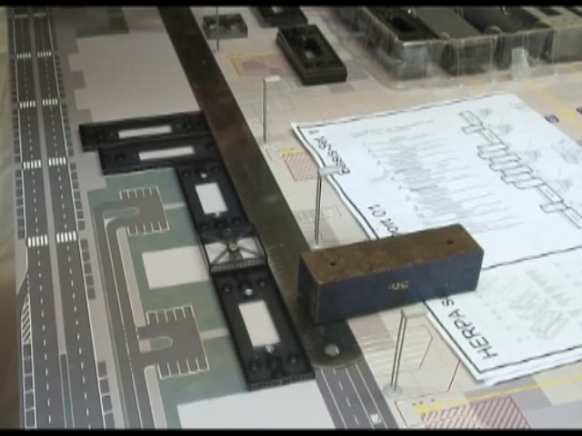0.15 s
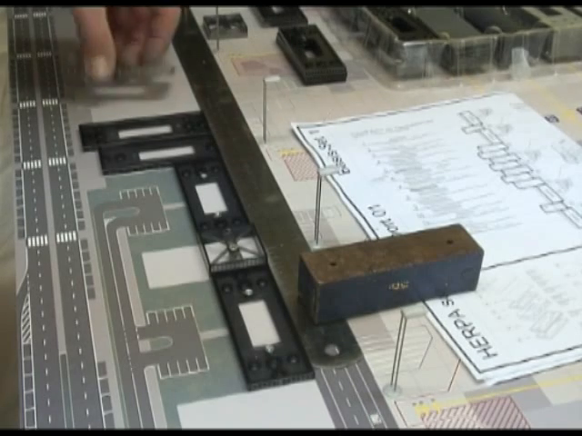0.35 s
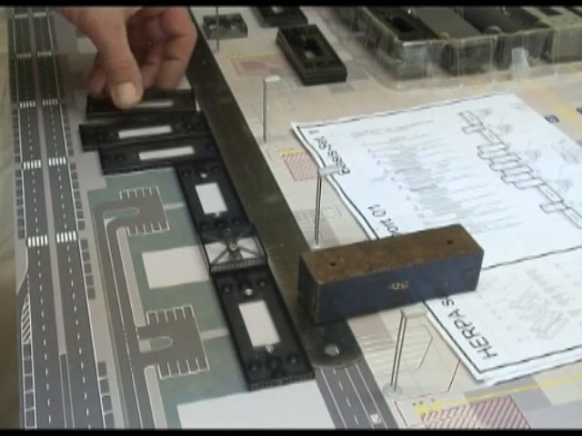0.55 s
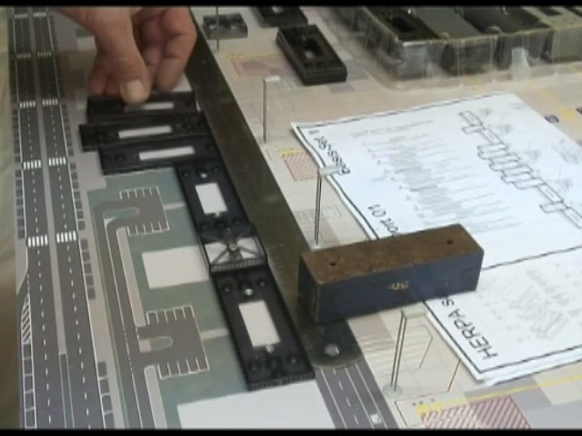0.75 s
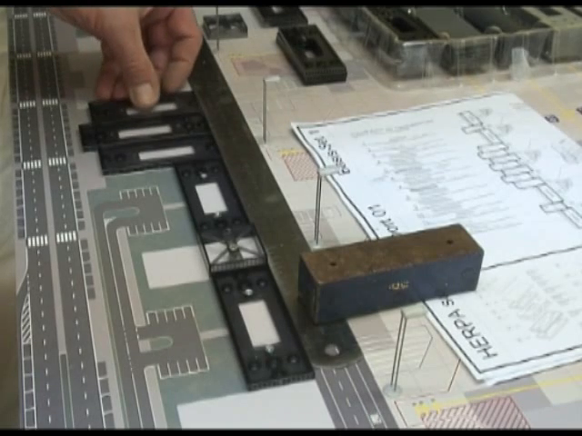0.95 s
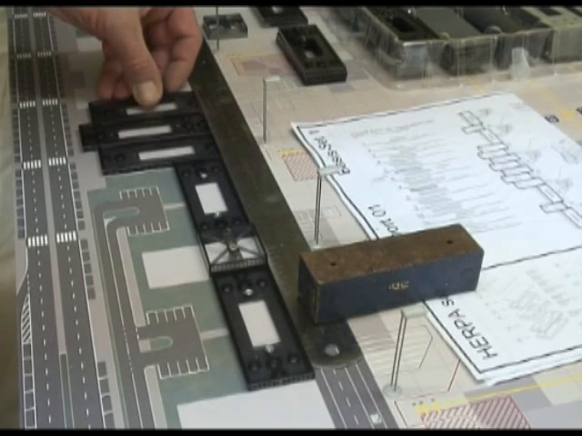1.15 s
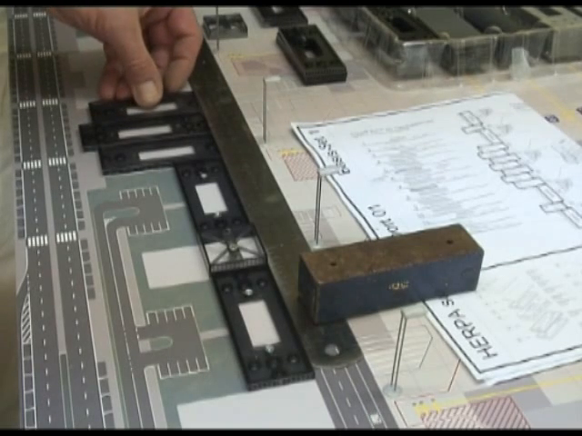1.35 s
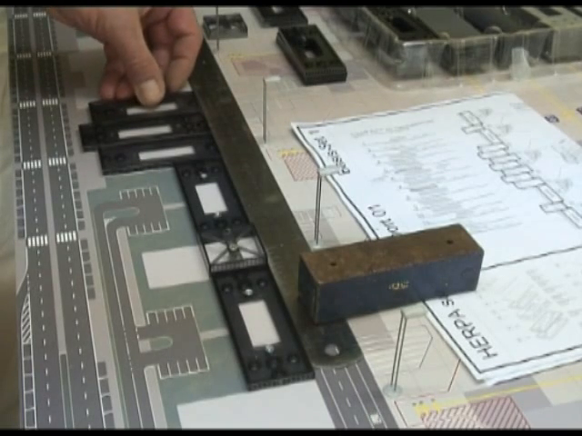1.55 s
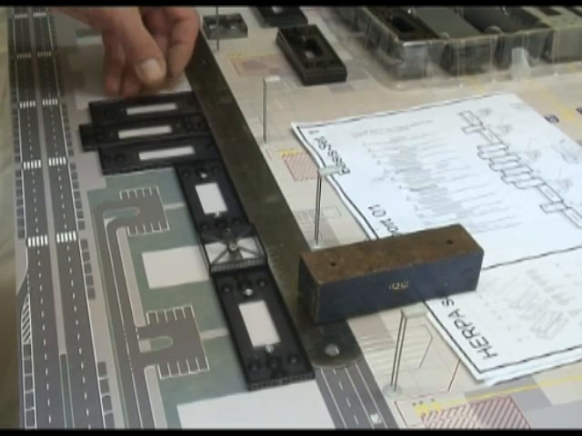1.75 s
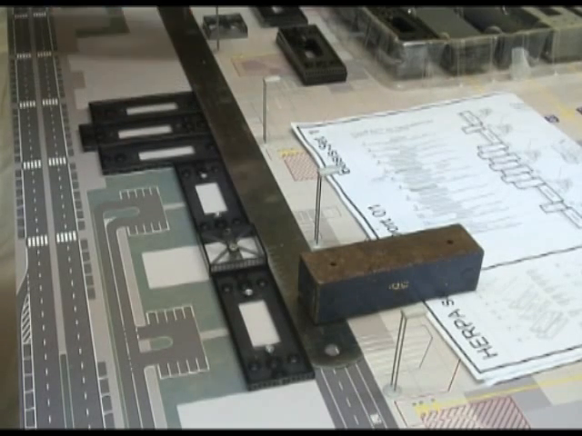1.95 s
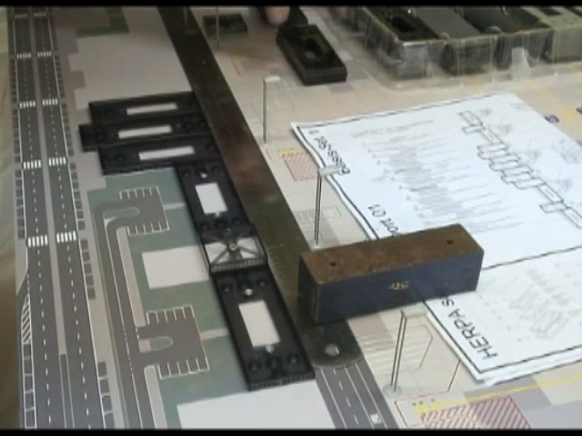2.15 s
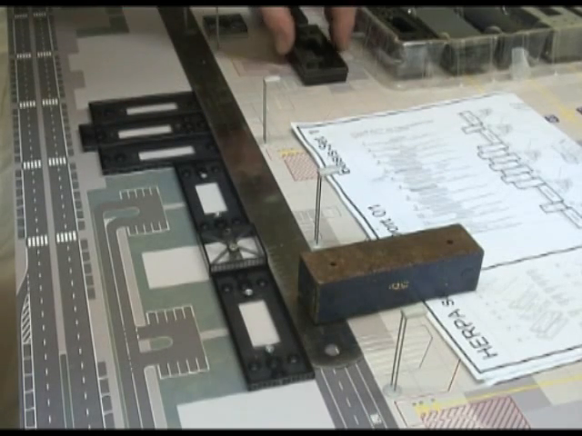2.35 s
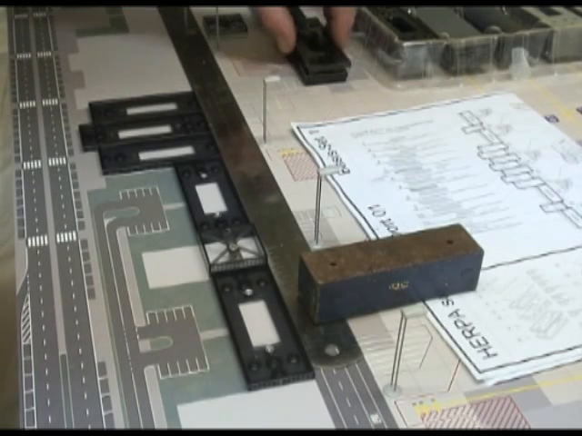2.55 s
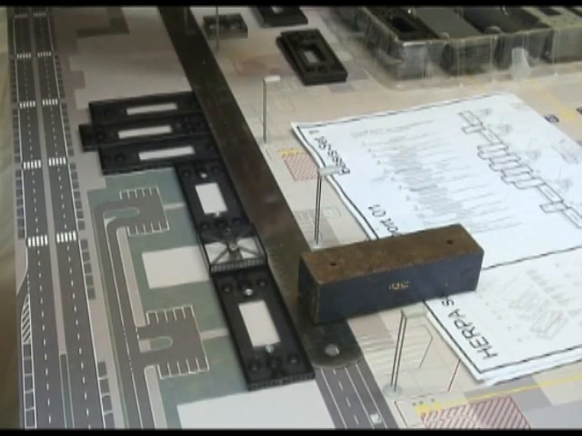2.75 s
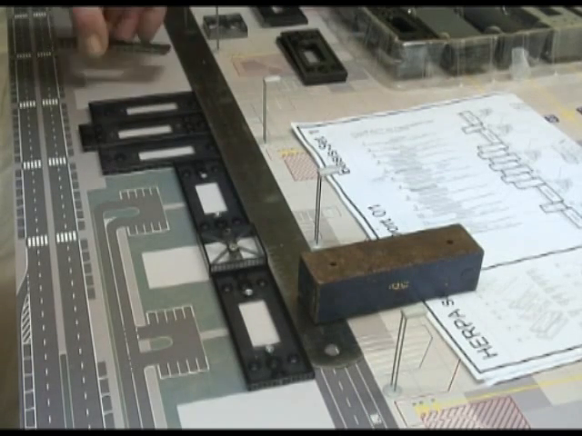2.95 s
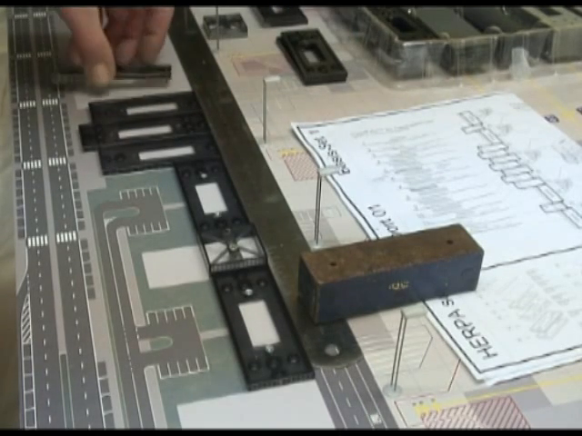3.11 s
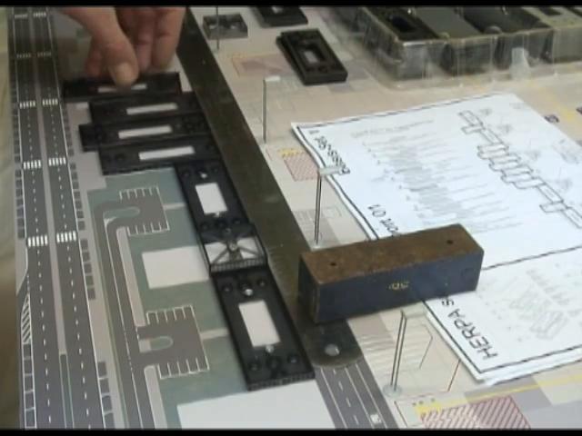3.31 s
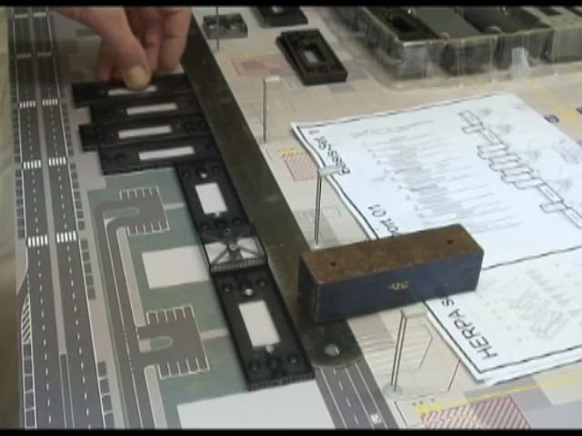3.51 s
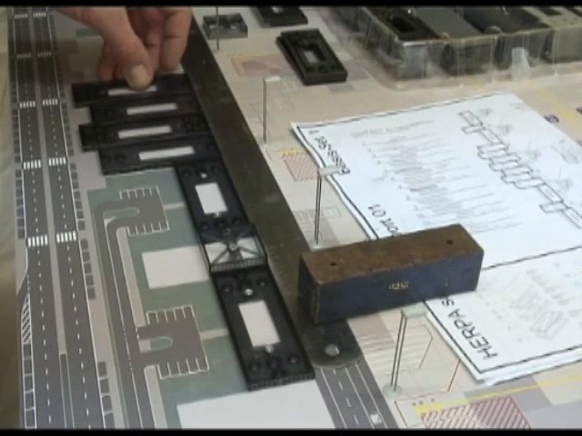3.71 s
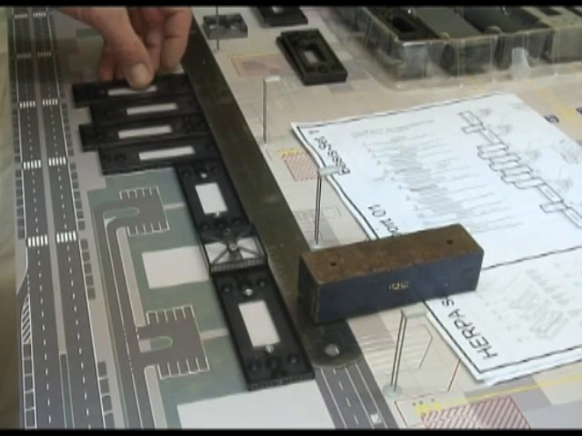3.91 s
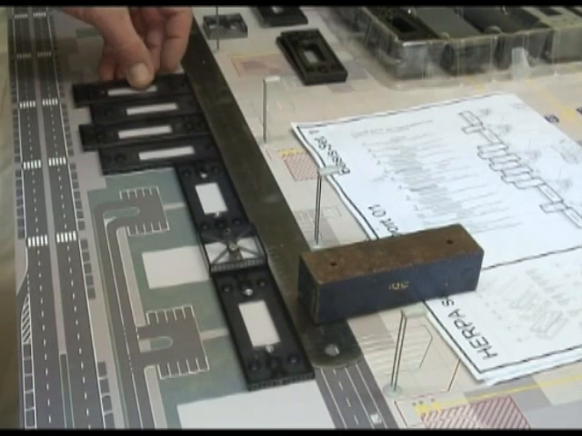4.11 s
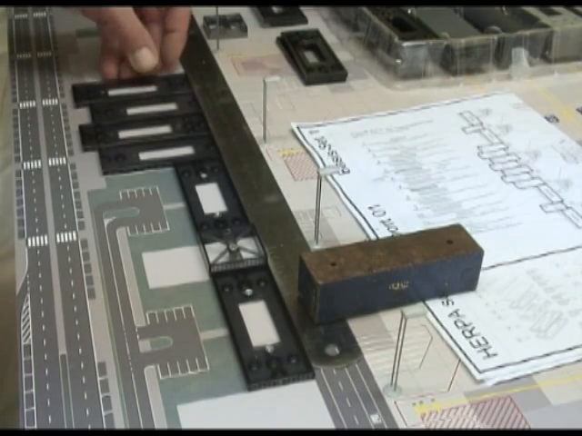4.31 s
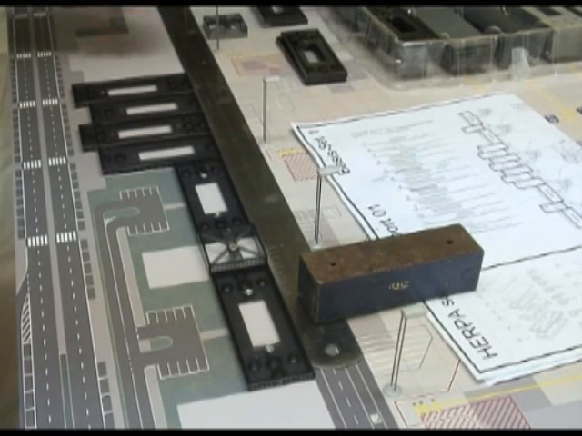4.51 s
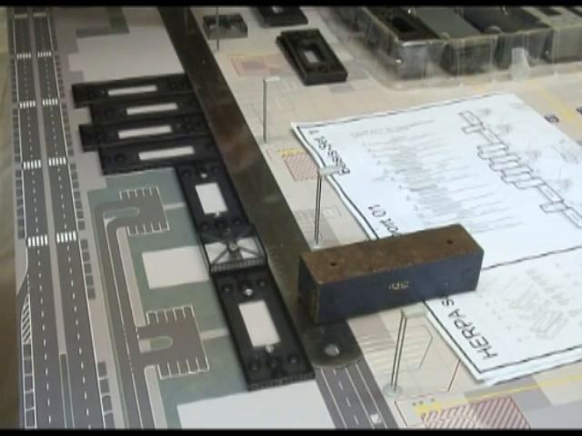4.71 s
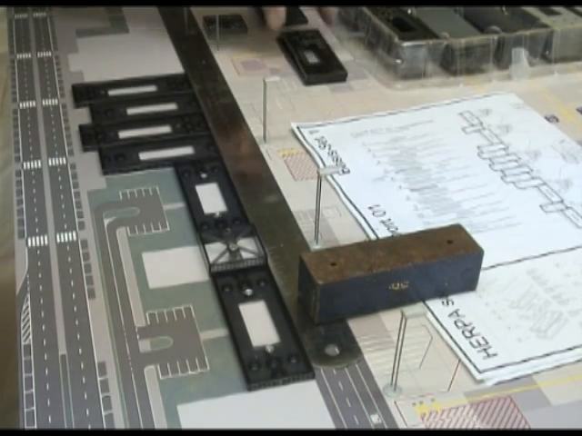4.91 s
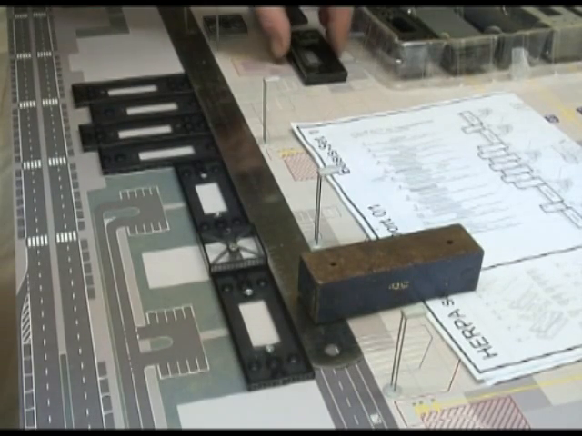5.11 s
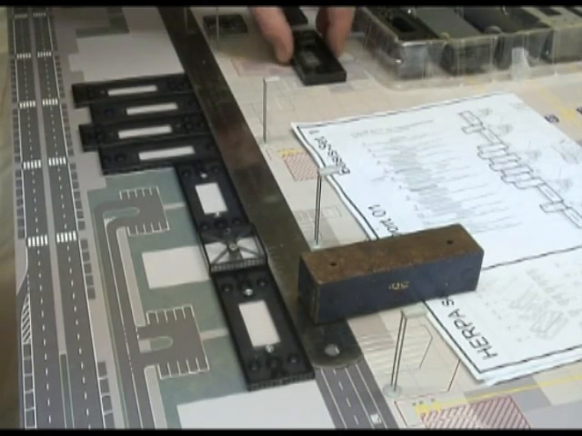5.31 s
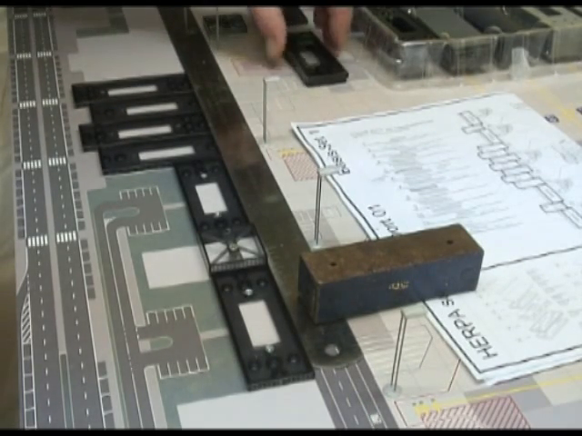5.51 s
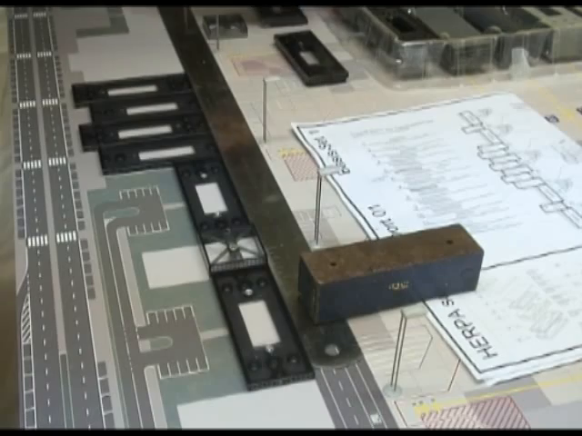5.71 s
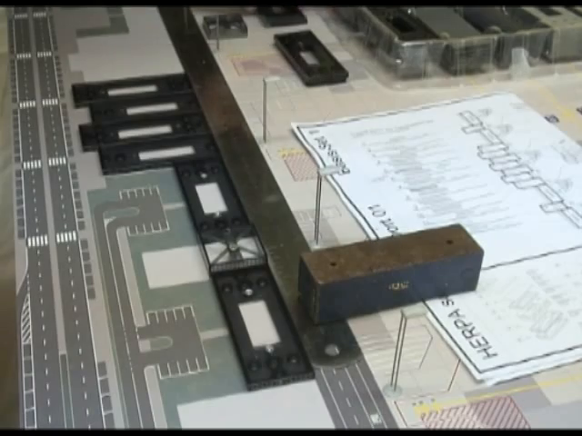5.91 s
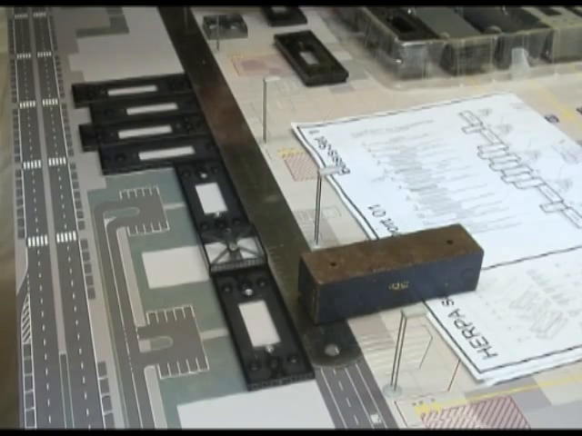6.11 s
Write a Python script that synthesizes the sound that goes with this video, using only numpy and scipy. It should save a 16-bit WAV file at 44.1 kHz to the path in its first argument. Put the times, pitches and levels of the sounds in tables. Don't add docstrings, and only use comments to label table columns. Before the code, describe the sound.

A faint steady hiss with low room hum runs throughout a small room with a short echo. Right at 0 s a hard plastic piece clacks sharply on a wooden board with a quick rattle and low thud. At 0.5 s there is a faint touch, then from 0.6 to 0.77 s a loud, bright, bouncing clatter, its hardest blows slightly overloaded. A crisp press snap comes at 1.0 s, dull soft touches near 1.23 s. Around 2.45-2.6 s a lighter tray scuffs and taps quietly further off. At 3.18 s a low knock leads into a very hard double clack at 3.23-3.26 s with brief chatter; small scrapes and a medium press click follow at 3.5-3.6 s. Barely audible touches continue until 4.4 s. Faint tray scrapes and taps come at 5.2-5.3, 5.53-5.6 and 5.9-6.07 s, then hiss.

```python
import sys
import numpy as np
from scipy import signal
from scipy.fft import rfft, irfft
from scipy.io import wavfile
from scipy.ndimage import uniform_filter1d

SR = 44100
rng = np.random.default_rng(int(sys.argv[2]) if len(sys.argv) > 2 else 0)


def store_wav(level_fs):
    pcm = np.round(np.clip(np.atleast_2d(level_fs), -1, 1) * 32767)
    wavfile.write(sys.argv[1], SR, pcm.T.astype(np.int16))


def ratio(d):
    e = np.asarray(d, float) / 20
    return 10 ** e


N = 276066


def evened(x):
    return x / np.sqrt(np.mean(x ** 2) + 1e-20)


def read(points, hz):
    f, value = np.transpose(points)
    return np.interp(np.log(hz + 1), np.log(f + 1), value)


def add(mix, start_s, sound):
    part = mix[..., round(start_s * SR):][..., :sound.shape[-1]]
    part += sound[..., :part.shape[-1]]


def pair(left, other, same):
    same = np.clip(same, -1, 1)
    right = same * left + np.sqrt(1 - same ** 2) * other
    return np.array([left, right])


# pitch in Hz, level in dB per Hz.
HISS_COLOUR = [(12, -60), (20, -13.5), (100, -8), (135, -6.5), (186, -7), (243, -6.5), (327, -5),
               (374, -8.5), (428, -1), (530, -14.5), (574, -11.5), (1550, -18), (2450, -18), (10500, -24),
               (12300, -29), (16000, -63), (22000, -120)]
# pitch in Hz, likeness from -1 to 1.
HISS_LIKENESS = [(60, -0.14), (170, -0.41), (500, -0.16), (1430, 0.22), (4110, 0.046), (11800, 0.0051)]


def hiss():
    frames, hz = N // 512 + 5, np.fft.rfftfreq(2048, 1 / SR)
    a, b, c, d, patches = rng.standard_normal((frames, len(hz), 5)).T
    patches = uniform_filter1d(patches, size=12, axis=0)
    patches = evened(uniform_filter1d(patches, size=8, axis=1))
    level_db = read(HISS_COLOUR, hz)[:, None] + 0.63 * patches
    z = pair(a + 1j * b, c + 1j * d, read(HISS_LIKENESS, hz)[:, None]) * ratio(level_db)
    noise = signal.istft(z, nperseg=2048, noverlap=1536)[1][:, :N]
    return ratio(-54) * evened(noise)


# pitch in Hz, time in seconds to fall by 60 dB.
ECHO_TIMES = [(150, 0.62), (400, 0.34), (1040, 0.36), (2760, 0.39), (7280, 0.34)]
# pitch in Hz, likeness from -1 to 1.
ROOM_LIKENESS = [(60, -0.37), (170, 1), (500, 0.25), (1430, 0.68), (4110, -0.036), (11800, -0.25)]


def room(x):
    size = 24000
    taps = rng.standard_normal((2, size)) * (rng.random((2, size)) < .15)
    hz, t, z = signal.stft(taps, SR, nperseg=256)
    fade = ratio(-60 * t / read(ECHO_TIMES, hz)[:, None])
    z = pair(*z, read(ROOM_LIKENESS, hz)[:, None]) * fade
    tail = signal.istft(z, SR, nperseg=256)[1][:, :size]
    tail = tail * np.clip((np.arange(size) / SR - .003) / .012, 0, 1)
    tail = tail / np.linalg.norm(tail[0])
    return signal.fftconvolve(x.mean(0)[None], tail, axes=1)[:, :N]


# start in seconds, level in dB, pitch in Hz, time in seconds to fall by 60 dB.
THUD_TONES = [(0.019, -41.5, 161, 0.5), (0.021, -37.5, 332, 0.31), (.03, -37, 266, 0.36),
              (3.611, -44, 331, 0.12), (2.451, -52, 253, 0.58), (2.52, -56.5, 165, 1),
              (3.183, -36, 337, 0.17), (3.19, -30, 193, 0.031), (5.272, -48.5, 165, 0.64),
              (5.288, -51, 291, 0.37), (5.577, -47.5, 165, 0.68), (5.92, -39.5, 560, 0.03),
              (5.988, -52.5, 281, 0.51), (6.068, -49.5, 1830, 0.12)]


def thuds():
    out, t = np.zeros((2, N)), np.arange(20000) / SR
    for start_s, db, hz, t60 in THUD_TONES:
        beat = 1 + 0.48 * np.cos(2 * np.pi * (0.18 * hz * t + rng.random((2, 1)) / 3))
        soft_edge = 1 - np.exp(-t * hz / 0.35)
        tone = np.sin(2 * np.pi * hz * t)
        add(out, start_s, ratio(db - 60 * t / t60) * soft_edge * beat * tone)
    return out


# pitch in Hz, level in dB per Hz.
CRACK_COLOUR = [(100, -17.5), (400, -8.5), (1170, -4.5), (2260, -1.5), (3750, -5), (6070, -2), (8200, -5.5),
                (10000, -9.5), (12300, -34), (16000, -51)]


def coloured(noise, body_hz, tilt_db, body_db, lumpy_db=1.0):
    hz = np.fft.rfftfreq(noise.shape[-1], 1 / SR)
    hump_db = body_db / (1 + ((hz - body_hz) / (.11 * body_hz)) ** 2)
    lumps = evened(uniform_filter1d(noise[2, :len(hz)], size=24))
    lumps_db = lumpy_db * np.clip(lumps, -2, 1.2)
    db = read(CRACK_COLOUR, hz) + tilt_db * np.log2((hz + 400) / 2500) + hump_db + lumps_db
    no_bass = hz ** 2 / (hz ** 2 + 220 ** 2)
    z = pair(*rfft(noise[:2]), read(ROOM_LIKENESS, hz) + 0.41) * ratio(db) * no_bass
    return evened(irfft(z, noise.shape[-1]))


def strokes(rows, grain_db, bright_db, body_db, swell, lumpy_db):
    bright_per_octave, hard_per_db = 1.15, 0.35
    out, t = np.zeros((2, N)), np.arange(4096) / SR
    for start_s, db, body_hz, length_s in rows:
        noise = rng.standard_normal((4, len(t)))
        clumps = evened(uniform_filter1d(noise[3], size=40))
        clumps = evened(ratio(grain_db * clumps))
        tilt_db = bright_db + bright_per_octave * np.log2(body_hz / 2500) + hard_per_db * db
        u = 3 * t / max(length_s, .003)
        envelope = (u * np.exp(1 - u)) ** swell
        grains = clumps * coloured(noise, body_hz, tilt_db, body_db, lumpy_db)
        add(out, start_s, ratio(db - 13.5) * envelope * grains)
    return out


# start in seconds, peak level in dB, body pitch in Hz, length in seconds.
TRAY_SLIDES = [(2.436, -39, 1000, 0.018), (2.446, -31.5, 2100, 0.018), (2.469, -39, 1180, 0.016),
               (2.504, -54, 1126, .018), (2.558, -36, 875, 0.026), (2.599, -49, 748, .033),
               (5.222, -40, 900, 0.074), (5.244, -34, 3840, 0.043), (5.260, -37.5, 970, 0.032),
               (5.280, -36.5, 2500, 0.017), (5.531, -34.5, 1750, 0.032), (5.540, -36.5, 4040, 0.024),
               (5.566, -31, 1460, 0.024), (5.580, -35, 960, .02), (5.600, -53, 1800, 0.06),
               (5.968, -38.5, 778, 0.031), (5.975, -43, 2600, 0.06), (6.004, -41, 800, 0.024),
               (6.030, -45, 4180, 0.029), (6.052, -36, 1200, .02), (6.066, -36, 1800, 0.02),
               (5.258, -38.5, 7600, 0.043), (5.560, -38.5, 8040, 0.021), (6.055, -48, 7500, 0.017)]


def tray_slides():
    return strokes(TRAY_SLIDES, grain_db=1.0, bright_db=7.5, body_db=12, swell=1.63, lumpy_db=5.5)


def ring(modes, luck, tilt_db=0, size=16000):
    hz, db, t60 = np.transpose(modes)[:, :, None]
    t, luck = np.arange(size) / SR, luck[:len(hz), None]
    level = ratio(db + 2.8 * np.clip(luck, -1, 1) + tilt_db * np.log2(hz / 2500) - 60 * t / t60)
    detuned_hz = hz * (1 + .003 * luck[::-1])
    angle, shift = 2 * np.pi * detuned_hz * t, luck * hz / 12000
    left = (level * np.sin(angle + shift)).sum(0)
    right = (level * np.sin(angle - shift)).sum(0)
    return np.array([left, right])


# pitch in Hz, level in dB, time in seconds to fall by 60 dB.
BOARD_RING = [(165, 1, 0.11), (234, -14, 0.56), (345, 1, 0.37), (449, -1, 0.26), (560, 4.5, 0.053)]


def knocks(blows, modes, ring_db, board_db, snap_db=0):
    out, t, modes = np.zeros((2, N)), np.arange(4096) / SR, np.array(modes)
    impulse = np.zeros(len(t))
    impulse[[14, 21, 37]] = .7, -1, .3
    rise = 1 - np.exp(-t / .0003)
    for start_s, db, body_hz, tilt_db in blows:
        t60 = 0.055 * 2 ** (-tilt_db / 4.5)
        noise, luck = rng.standard_normal((3, len(t))), rng.standard_normal(30)
        clicks = np.array([impulse, np.roll(impulse, 1), noise[2]])
        snap = coloured(clicks, body_hz, tilt_db, body_db=8)
        snap = snap / abs(snap).max() * np.exp(-t / .004)
        crack = ratio(-60 * t / max(t60, .003)) * coloured(noise, body_hz, tilt_db, body_db=6.0)
        blow = 1.6 * ratio(snap_db) * snap + .17 * crack
        add(out, start_s, ratio(db) * rise * blow)
        favoured_db = 14 * (abs(modes[:, :1] / body_hz - 1) < .05) * [0, 1, 0]
        dulling_db = .8 * min(tilt_db, 0)
        plastic = ring(modes + favoured_db, luck, dulling_db, size=10000)
        add(out, start_s, ratio(db + ring_db - 19) * plastic)
        wood_db = db + 3.1 * min(-tilt_db, 4) + board_db
        add(out, start_s, ratio(wood_db) * ring(BOARD_RING, luck[::-1]))
    return out


# start in seconds, peak level in dB, body pitch in Hz, brightness in dB per octave.
TRAY_TAPS = [
    (2.460, -39.5, 2300, 0.5),
    (5.1985, -39, 2250, -7.5),
    (5.207, -40, 1120, 1),
    (5.561, -40.5, 7300, 11),
    (5.914, -41, 600, -2),
    (5.920, -47, 4300, -3),
    (6.0615, -39.5, 3500, 6),
]
# pitch in Hz, level in dB, time in seconds to fall by 60 dB.
TRAY_RING = [(900, 7, 0.034), (1200, 13, 0.048), (2250, 1, 0.055), (3600, 6, 0.03), (4300, 7, .05),
             (7300, 0, .05), (8300, -10, .06)]


def tray_taps():
    return knocks(TRAY_TAPS, TRAY_RING, ring_db=-9.5, board_db=-28.5)


# start
# in seconds, peak level in dB, body pitch in Hz, length in seconds.
STRIP_CHATTER = [(.021, -13, 3500, 0.015), (.031, -7.5, 6650, 0.034), (.040, -17, 4200, 0.0059),
                 (.052, -25, 6120, 0.049), (.656, -5, 6040, 0.056), (.671, -13, 3070, 0.074),
                 (.691, -2.5, 2500, 0.021), (.7255, -5.5, 2400, 0.0072), (.733, -12.5, 4350, 0.04),
                 (.955, -33, 1340, .029), (.980, -24.5, 4300, 0.024), (.999, -12.5, 2160, 0.014),
                 (1.02, -39, 3200, 0.027), (1.052, -28.5, 2110, 0.016), (3.235, -15, 2200, 0.024),
                 (3.264, -7, 7600, 0.067), (3.274, -6, 2700, 0.026), (3.289, -7, 3600, 0.054),
                 (3.303, -11, 1770, 0.016), (3.505, -36, 1070, 0.023), (3.527, -30.5, 1140, 0.018),
                 (3.545, -38, 1190, 0.042), (3.612, -36, 2380, 0.013)]


def strip_chatter():
    return strokes(STRIP_CHATTER, grain_db=2.5, bright_db=.1, body_db=6, swell=1, lumpy_db=1.8)


HELD_RING_DB = -46

# start in seconds, peak level in dB, body pitch in Hz, brightness in dB per octave.
SECOND_BLOWS = [
    (3.181, -33, 1610, -4),
    (3.1897, -22, 930, -6),
    (3.2322, -1.5, 2200, -3.5),
    (3.2632, 4.5, 5100, 2),
]
SECOND_PRESSES = [
    (3.5712, -25.5, 1170, -9),
    (3.582, -30, 1940, -6),
    (3.600, -41, 900, -8),
    (3.6078, -18.5, 2560, -4.5),
    (3.743, -40, 1730, -8.5),
    (4.089, -42.5, 1690, -13),
    (4.19, -41.5, 739, -7),
    (4.439, -41, 921, -10.5),
]
# pitch in Hz, level in dB, time in seconds to fall by 60 dB.
SECOND_RING = [(1750, 14, 0.059), (2370, 29, .06), (2830, 6.5, 0.017), (5200, -13, .05), (7224, -5.5, 0.1),
               (8950, 7, .08), (10900, 14, 0.07), (11930, 15.5, 0.18)]


def second_strip():
    landing = knocks(SECOND_BLOWS, SECOND_RING, ring_db=-27.5, board_db=-46.0)
    pressing = knocks(SECOND_PRESSES, SECOND_RING, HELD_RING_DB, board_db=-45.5, snap_db=-0.5)
    return landing + pressing


# start in seconds, peak level in dB, body pitch in Hz, brightness in dB per octave.
FIRST_BLOWS = [(.013, -27, 4130, -3), (.0196, 0, 6120, 1), (.0395, -7, 4325, 5), (.502, -31, 1210, -8.5),
               (.5985, -17, 2220, -7.5), (.616, -14, 4280, -10), (.630, -18, 6100, -12.5),
               (.6537, 5, 6000, -2), (.6975, -7, 4300, 16), (.7292, -0.5, 4440, -3),
               (.748, -30.5, 2410, -17), (.760, -17, 1500, -10)]
FIRST_PRESSES = [
    (.913, -32.5, 560, -13),
    (.9945, -41, 1220, 5),
    (.998, -7, 4300, -2),
    (1.226, -35.5, 860, -9.5),
    (1.237, -28, 900, -8.5),
]
# pitch in Hz, level in dB, time in seconds to fall by 60 dB.
FIRST_RING = [(1133, -3, 0.074), (2163, -4.5, 0.11), (3072, -15.5, 0.17), (4136, -9.5, 0.11),
              (4244, -3, 0.057), (6070, -12, 0.089), (6120, -23, 0.073), (6850, -2.5, 0.16),
              (7750, -6.5, 0.19), (8400, -7, 0.17), (9390, 0.5, 0.17), (9530, -3, 0.13), (10870, -4, 0.15),
              (11080, -8, 0.088)]


def first_strip():
    bouncing = knocks(FIRST_BLOWS, FIRST_RING, ring_db=-4, board_db=-63.5)
    pressing = knocks(FIRST_PRESSES, FIRST_RING, HELD_RING_DB, board_db=-52, snap_db=3.0)
    return bouncing + pressing


def scene():
    parts = tray_slides() + tray_taps() + strip_chatter() + second_strip() + first_strip()
    no_bass = signal.butter(3, 190, "high", fs=SR, output="sos")
    parts = signal.sosfilt(no_bass, parts)
    return hiss() + room(ratio(-6) * parts) + thuds() + parts


def roll_off(x):
    return signal.sosfilt(signal.butter(12, 12430, fs=SR, output="sos"), x)


# start in seconds, left level in dB, right level in dB.
OVERLOAD_KICKS = [
    (.6545, -17, -26),
    (.7300, -22, -27),
    (3.2640, -16, -20),
]


def record(dry):
    x, t = 1 * dry, np.arange(4000) / SR
    kick = .12 * np.exp(-(t / .025) ** 2) - np.exp(-((t - .001) / .0012) ** 2)
    for start_s, *db in OVERLOAD_KICKS:
        add(x, start_s, ratio(np.array(db))[:, None] * kick)
    ceiling = .75
    x = ceiling * np.tanh((np.abs(x) / ceiling) ** 4) ** (1 / 4) * np.sign(x)
    treble_limit = signal.firwin(255, 12050, window=("kaiser", 7), fs=SR)
    x = signal.oaconvolve(x, treble_limit[None], "same")
    return roll_off(x)


dry = scene()
out = record(dry)
store_wav(out)
```